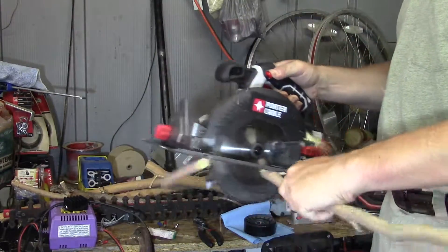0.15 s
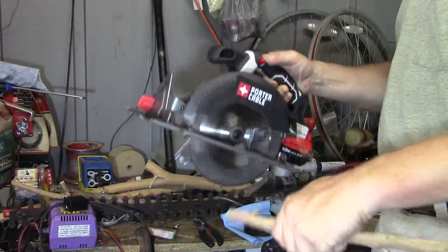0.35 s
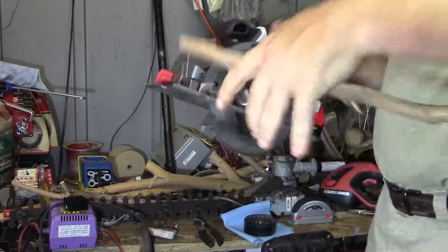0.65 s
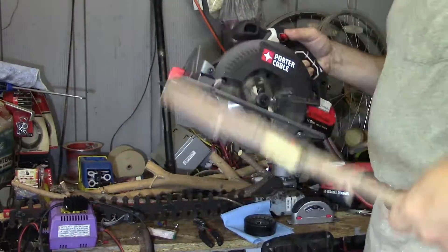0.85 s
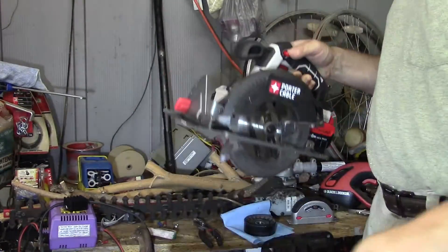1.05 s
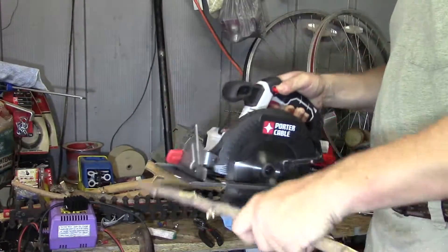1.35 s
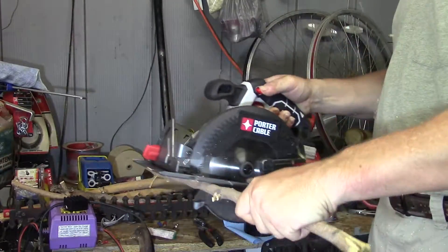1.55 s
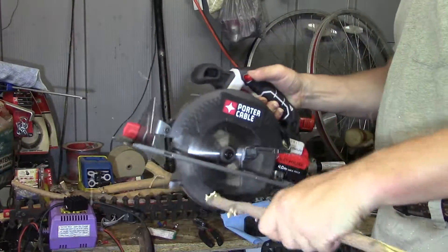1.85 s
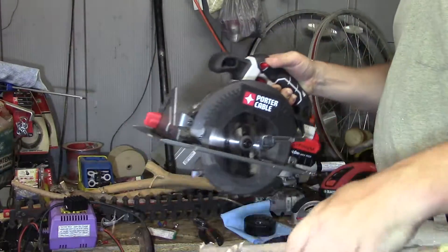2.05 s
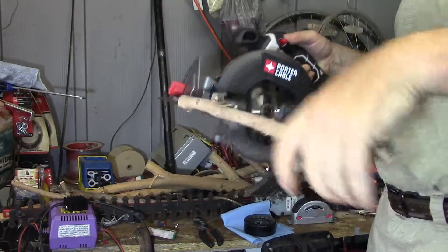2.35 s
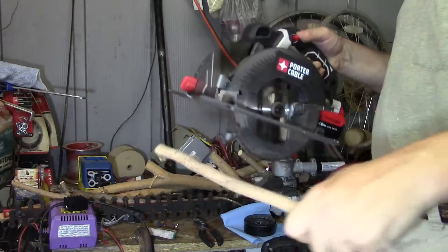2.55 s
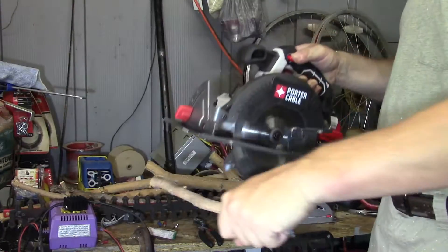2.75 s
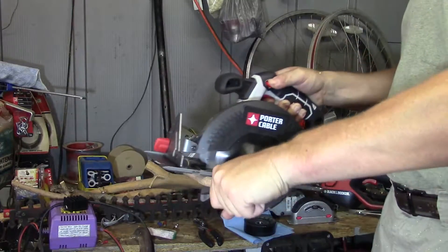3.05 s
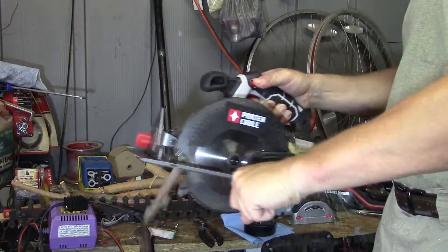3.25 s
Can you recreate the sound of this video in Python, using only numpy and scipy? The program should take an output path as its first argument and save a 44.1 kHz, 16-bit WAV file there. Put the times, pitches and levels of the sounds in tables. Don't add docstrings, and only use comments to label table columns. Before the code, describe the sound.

A handheld circular saw, already spinning, rips through a thin stick and brakes; the offcut knocks down. It spins up for a second cut, pieces clatter, then a third cut follows, close in a small workshop.

```python
import sys
import numpy as np
from scipy import signal
from scipy.fft import rfft, irfft, next_fast_len
from scipy.io import wavfile
from scipy.ndimage import uniform_filter1d, map_coordinates

SR = 44100
rng = np.random.default_rng(int(sys.argv[2]) if len(sys.argv) > 2 else 0)


def master_out(mix):
    frames = np.transpose(np.atleast_2d(mix))
    ceiling = np.clip(frames, -1, 1)
    pcm = np.round(ceiling * 32767).astype(np.int16)
    wavfile.write(sys.argv[1], SR, pcm)


def to_linear_factor(level_db):
    exponent = np.asarray(level_db, float) / 20
    return 10 ** exponent


N = 149940
T = np.arange(N) / SR

# frequency in Hz, level in dB per Hz.
FLOOR_SPECTRUM = [(18, -80.5), (30, -39), (182, -11), (299, -18), (359, -5), (532, -14.5), (2830, -25),
                  (3230, -28.5), (15500, -56.5)]
# frequency in Hz, gain in dB.
FLOOR_SIDE_GAIN = [(40, -10), (150, -15), (1000, -17)]
# frequency in Hz, 60 dB decay time in seconds.
ROOM_DECAY = [(200, 0.37), (2000, 0.24), (10000, .15)]
# frequency in Hz, side level under mid in dB.
ROOM_SIDE_GAIN = [(60, -10), (180, -20), (550, -29), (1650, -34), (3000, -31), (4970, -24), (15000, -19)]
FLOOR_DB, WET_DB = -49.5, -7

# start in seconds, length in seconds, level in dB, centre in Hz.
RUBS = [
    (0.625, 0.13, -40, 520),
    (2.825, 0.033, -33.5, 1300),
    (2.826, 0.43, -40.5, 265.5),
]

# start in seconds, peak level in dB, brightness in dB an octave.
STICK_HITS = [
    (.579, -8.5, -2),
    (.602, -20, 3),
    (.651, -30, 2.5),
    (.728, -34.5, -0.3),
    (.757, -16.5, 2),
    (.892, -32, -4),
]
TIN_HITS = [
    (2.089, -17, 1.85),
    (2.095, -19.5, -3),
    (2.108, -14.5, -1.5),
]
TWIG_HITS = [
    (2.292, -30, -5.5),
    (2.307, -26, -9),
    (2.388, -18, 0.9),
]
BENCH_HITS = [
    (2.543, -7.5, 0.13),
    (2.771, -25, 0.08),
    (2.809, -13.5, 0.1),
]
TRIGGER_HITS = [
    (1.131, -30, 0.11),
    (1.803, -32, .1),
    (2.749, -30, 1.58),
]
# frequency in Hz, level in dB, 60 dB decay time in seconds (at most 0.21
# s are used).
STICK_MODES = [(361, -4, 0.094), (736, 3, 0.11), (2160, -8.5, 0.24), (4124, -21, 0.097),
               (5170, -16.5, 0.094), (5373, -25, 0.23)]
TIN_MODES = [(350.5, -8, 0.17), (1680, -23.5, 0.16), (3830, -12.5, .12), (4194, -7.5, 0.15),
             (4150, -13, 0.13), (7000, -14, .11), (9150, -28, 0.05)]
TWIG_MODES = [(1100, -4.5, 0.19), (1675, -6.5, 0.15), (1846, -4, 0.23), (3180, -4, 0.26), (4600, -7, 0.29),
              (6000, -6, 0.15), (8530, -15, 0.22)]
BENCH_MODES = [(413, -12, 0.26), (716, 3, 0.12), (1130, -6, 0.12), (1340, 0, 0.14), (1450, -8, 0.12),
               (2089, -29, .18), (2900, -26, .16), (5700, -24, .07), (7100, -20, .19), (7930, -16, 0.14)]
TRIGGER_MODES = [(1384, 0.4, .3)]
# frequency in Hz, level in dB per Hz.
STICK_CRACK = [(88, -47.5), (150, 1), (1700, -4), (2410, -13.5), (5330, -23.5), (15500, -53.5)]
TIN_CRACK = [(100, -21), (383, -11), (3050, -13), (4220, 0), (5610, -24.5), (7160, -10), (15500, -55.5)]
TWIG_CRACK = [(100, -46), (500, -20.5), (1500, -5), (8080, -9.5), (15500, -39)]
BENCH_CRACK = [(88, -38), (150, 1), (450, -3.5), (1200, -3.5), (2810, -9), (7410, -25), (15500, -69)]
TRIGGER_CRACK = [(100, -38), (1420, -3), (3600, -9.5), (12800, -27.5), (15500, -48)]

# time in seconds, bite level in dB, brightness in dB.
CUTS = [
    [(0, -29.5, -16), (.013, -13, 5.5), (.04, -16.5, 3), (.075, -18, 5), (.105, -12.5, -1),
     (.135, -15, -2.5), (.175, -34, -3.5)],
    [(1.492, -36, 11), (1.499, -11, 2), (1.54, -16, -1.5), (1.6, -20, 2.5), (1.625, -18.5, 8.5),
     (1.655, -22.5, 5.5), (1.695, -16, -2.5), (1.735, -37.5, -11)],
    [(3.1, -33.5, 11), (3.118, -13, 0.5), (3.15, -13, 4), (3.175, -13, 1), (3.23, -19, -1),
     (3.27, -32, -10)],
]
# frequency in Hz, level in dB per Hz.
CHIP_SPECTRUM = [(180, -62.5), (300, -35.5), (1100, -4), (1680, -8), (3980, -2), (5830, -3.5), (8540, 9),
                 (15800, -10.5)]
# frequency in Hz, width in Hz, level in dB.
BLADE_MODES = [
    [(1014, 60, -19), (1454, 22, 3.5), (2251, 30, -10), (4110, 27, 0), (5420, 29, -9.5), (6210, 93, -8),
     (7040, 25, 2), (7270, 48, -3.5), (7600, 85, -4.5), (8240, 33, -6), (8600, 66, -8.5), (8840, 54, -3.5),
     (9430, 100, -6.5)],
    [(1422, 37, -3), (1886, 47, -1), (3560, 26, -5.5), (4190, 51, -2.5), (5450, 21, -15), (6200, 70, -2.5),
     (6700, 130, -6.5), (7000, 36, 1), (7600, 41, -2.5), (8210, 40, -2), (8650, 75, -4), (8700, 58, 3),
     (9950, 37, -6)],
    [(1430, 160, -5), (2283, 64, -1), (2760, 36, -10), (3080, 27, -2), (3496, 15, -3.5), (3840, 210, 0),
     (5980, 51, -17), (7280, 97, 5.5), (7780, 92, -1), (7750, 53, 2.5), (8050, 120, -3.5),
     (8700, 190, -1.5), (10100, 49, -6.5)],
]
# frequency in Hz, level in dB, 60 dB decay time in seconds,
# swell in dB as the blade stops.
AFTER_RING = [(2729, 0, .7, 3), (2785, 4, 2.4, 2), (2896, -2, .8, 5), (4915, -7, .9, 11), (2213, -7, .8, 0),
              (1840, -10, 1.5, 2), (1061, -9, 1.2, 0), (3350, -14, 1.2, 5), (3838, -12, 1, 4),
              (3558, -9, .4, 0), (7630, -12, .6, 4)]
RING_EACH_DB = [-37, -39, -43]
SPLIT_HZ, BLADE_DB = 5250, 12.5
TOOTH_JITTER, TOOTH_SHARE = .35, .33
STOPS_S, SWELL_S = .2, .06

# pulled in seconds, released in seconds, motor level in dB.
PULLS = [
    (-.4, 0.279, -29.5),
    (1.144, 1.805, -29),
    (2.756, 3.36, -27),
]
# multiple of mesh rate, driven level in dB, braking level in dB.
MESH_LINES = [(1, -4, -12.5), (2, -8, -7), (3, -10.5, -11), (4, -6, -18), (5.5, -28, -20)]
# frequency in Hz, gain in dB.
GEARBOX_GAIN = [(500, -16), (1400, 0.5), (2300, 3), (3400, -1), (4700, -13), (5800, -17), (7000, -3.5),
                (9500, -10), (14000, -5.5)]
# frequency in Hz, level in dB per Hz.
HOUSING_SPECTRUM = [(150, -53), (250, -20), (1740, -10.5), (3500, -11.5), (5570, -20), (7300, -31.5),
                    (10800, -24.5), (13300, -12), (15800, -42)]
# frequency in Hz, width in Hz, level in dB.
WHINE_MODES = [(1530, 130, -6), (2220, 390, 6), (4000, 323, 1), (7360, 380, 7), (12600, 660, -10)]
MESH_HZ, SPINUP_S, BRAKE_S = 2607, .125, .112
LOAD_SAG, RECOVER_S, DRAG_HZ = .07, .15, 328.5
MESH_PER_TURN, PINION_TEETH, BLADE_TEETH = 42, 5.6, 19
IDLE_TORQUE, BRAKING_TORQUE = .3, 1.6
LOUDER_POWER, BRAKE_DB = .78, 1.5
SIDEBAND_DB, TURN_DEPTH, WANDER, ROUGH_RAD = -10.5, .9, .0048, .42


def unit(x):
    return x / np.sqrt(np.mean(x ** 2) + 1e-20)


def along(points, hz):
    f, v = np.transpose(points)
    return np.interp(np.log(hz + 1), np.log(f + 1), v)


def wobble(rate):
    return map_coordinates(rng.standard_normal(int(N * rate / SR) + 4), [T * rate])


def filtered(x, response):
    m = next_fast_len(x.shape[-1] + 2 * SR)
    spectrum = rfft(x, m) * response(np.fft.rfftfreq(m, 1 / SR))
    return irfft(spectrum, m)[..., :x.shape[-1]]


def colour(points):
    return lambda hz: to_linear_factor(along(points, hz))


def resonances(rows):
    def response(f):
        total = 0
        for k, (centre, width, db) in enumerate(rows):
            damping = 1j * f * width
            total = total + (-1) ** k * to_linear_factor(db) * damping / (centre * centre - f * f + damping)
        return total
    return response


def patchy(x, depth_db):
    z = signal.stft(x, nperseg=256)[2]
    field = uniform_filter1d(rng.standard_normal(z.shape), size=3, axis=0)
    field = uniform_filter1d(field, size=6, axis=1)
    return signal.istft(z * to_linear_factor(depth_db * unit(field)), nperseg=256)[1][:N]


def floor_noise():
    noise = filtered(rng.standard_normal((2, N)) * to_linear_factor(1.7 * wobble(12)), colour(FLOOR_SPECTRUM))
    return noise * to_linear_factor(FLOOR_DB) / np.std(noise[0])


def workshop(x):
    hz, t, z = signal.stft(rng.standard_normal((2, SR // 2)), SR, nperseg=256)
    decay = to_linear_factor(-60 * t / along(ROOM_DECAY, hz)[:, None])
    tail = signal.istft(z * decay, SR, nperseg=256)[1]
    delayed = np.pad(x, (250, 0))[None]
    return signal.fftconvolve(delayed, tail / np.linalg.norm(tail[0]), axes=1)[:, :N]


def rubs():
    out = 0
    for s, length, db, hz in RUBS:
        shape = np.clip(np.minimum((T - s) / 0.0047, (s + length - T) / (.4 * length)), 0, 1)
        dull = lambda f: resonances([(hz, 1.6 * hz, 0)])(f) ** 2 / (1 + (f / 4500) ** 2)
        scrape = unit(filtered(rng.standard_normal(N), dull))
        out = out + shape * to_linear_factor(db + 3 * wobble(90)) * scrape
    return out


def knock(hits, modes, crack, ring_db, crack_s, crack_db):
    out, t = np.zeros(N + SR), T[:SR // 2]
    for s, db, tilt_db in hits:
        tilt = lambda f: to_linear_factor(tilt_db * np.log2((f + 1) / 1500))
        contact = lambda f: colour(crack)(f) * tilt(f)
        ring = 0
        for hz, mode_db, t60 in modes:
            envelope = to_linear_factor(mode_db + 2.8 * wobble(60)[:len(t)] - 60 * t / min(t60, .21))
            ring = ring + envelope * tilt(hz) * np.sin(2 * np.pi * hz * t)
        burst = unit(filtered(rng.standard_normal(len(t)), contact)) * to_linear_factor(crack_db - 60 * t / crack_s)
        tick = unit(filtered(rng.standard_normal(len(t)), lambda f: contact(f) ** 1.8))
        tick = tick * to_linear_factor(-13.0 - 60 * t / 0.0072)
        onset = 1 - np.exp(-t * SR / 10)
        out[round(s * SR):][:len(t)] += to_linear_factor(db) * (to_linear_factor(ring_db) * ring + burst + tick) * onset
    return out[:N]


def offcuts_and_trigger():
    stick = knock(STICK_HITS, STICK_MODES, STICK_CRACK, ring_db=-17, crack_s=.11, crack_db=-5.5)
    tin = knock(TIN_HITS, TIN_MODES, TIN_CRACK, ring_db=-5, crack_s=.041, crack_db=-2.16)
    twig = knock(TWIG_HITS, TWIG_MODES, TWIG_CRACK, ring_db=-12, crack_s=.063, crack_db=-2.5)
    bench = knock(BENCH_HITS, BENCH_MODES, BENCH_CRACK, ring_db=-19, crack_s=.096, crack_db=-7)
    trigger = knock(TRIGGER_HITS, TRIGGER_MODES, TRIGGER_CRACK, ring_db=-14, crack_s=.19, crack_db=-11.5)
    return stick + tin + twig + bench + trigger


def after_ring():
    out = 0
    for rows, (on, off, _), cut_db in zip(CUTS, PULLS, RING_EACH_DB):
        t = np.clip(T - rows[-2][0], 0, None)
        stop = np.exp(-((T - off - STOPS_S) / SWELL_S) ** 2)
        for hz, db, t60, swell_db in AFTER_RING:
            envelope = to_linear_factor(cut_db + db + swell_db * stop + 2 * wobble(16) - 60 * t / t60)
            out = out + envelope * np.sin(2 * np.pi * hz * t)
    return out


def bite(cuts):
    low, high = np.zeros(N), np.zeros(N)
    for rows in cuts:
        s, db, bright_db = np.transpose(rows)
        inside = np.clip(np.minimum(T - s[0] + 0.001, s[-1] - T) / 0.0035, 0, 1)
        low += inside * to_linear_factor(np.interp(T, s, db))
        high += inside * to_linear_factor(np.interp(T, s, db + bright_db))
    return low, high


def drive():
    hz, gain, torque = np.zeros(N), np.zeros(N), np.zeros(N)
    keep = np.exp(-1 / (RECOVER_S * SR))
    load = signal.lfilter([1 - keep], [1, -keep], bite(CUTS)[0])
    for on, off, db in PULLS:
        released = T > off
        up = MESH_HZ * (1 - np.exp(-np.clip(np.minimum(T, off) - on, 0, None) / SPINUP_S))
        slowing = np.exp(-np.clip(T - off, 0, None) / BRAKE_S)
        speed = np.clip((up + DRAG_HZ) * slowing - DRAG_HZ, 0, None)
        hz += speed
        gain += to_linear_factor(db + BRAKE_DB * released) * (speed / MESH_HZ) ** np.where(released, .9, LOUDER_POWER)
        driving = np.clip(IDLE_TORQUE + 5 * (1 - up / MESH_HZ), 0, 1.2)
        torque += (speed > 0) * np.where(released, BRAKING_TORQUE, driving)
    return hz * (1 - LOAD_SAG * load / load.max()), gain, torque


def tooth_force():
    teeth = np.cumsum(drive()[0]) / SR * BLADE_TEETH / MESH_PER_TURN
    at = np.flatnonzero(np.diff(np.floor(teeth + TOOTH_JITTER * wobble(900))) > 0)
    strikes = np.zeros(N)
    strikes[at] = to_linear_factor(2.7 * rng.standard_normal(len(at)))
    gate = np.convolve(strikes, to_linear_factor(-60 * T[:200] / 0.0017))[:N]
    gated = TOOTH_SHARE * unit(gate) + 1 - TOOTH_SHARE
    return rng.standard_normal(N) * gated * to_linear_factor(2.01 * wobble(70))


def cutting():
    force, chips = tooth_force(), colour(CHIP_SPECTRUM)
    grid = np.fft.rfftfreq(SR // 4, 1 / SR)
    low_band = lambda f: 1 / (1 + (f / SPLIT_HZ) ** 6)
    high_band = lambda f: 1 - low_band(f)
    out = 0
    for rows, modes in zip(CUTS, BLADE_MODES):
        blade = resonances(modes)
        for gain, band in zip(bite([rows]), (low_band, high_band)):
            body = lambda f: band(f) * chips(f) * (1 + to_linear_factor(BLADE_DB) * blade(f) / (0.26 + chips(f)))
            level = np.linalg.norm(body(grid)) / np.sqrt(len(grid))
            out = out + filtered(gain * force, body) / level
    return to_linear_factor(-2.5) * patchy(out, depth_db=2.5) + after_ring()


def gear_mesh(turn, torque):
    lines = 0
    for k, db, brake_db in MESH_LINES:
        level = np.where(torque >= BRAKING_TORQUE, brake_db, db) + 4 * wobble(70)
        lines = lines + to_linear_factor(level) * np.sin(k * turn + ROUGH_RAD * k * wobble(300))
    return lines * (1 + to_linear_factor(SIDEBAND_DB) * 2 * np.cos(turn / PINION_TEETH))


def brush_noise(turn, speed):
    hiss = rng.standard_normal((3, N)) * to_linear_factor(1.2 * np.array([wobble(30), wobble(27), wobble(30)]))
    throb = np.exp(TURN_DEPTH * 2 * np.cos(turn / MESH_PER_TURN))
    top = resonances(WHINE_MODES[-1:])
    broad = unit(filtered(hiss[0], colour(HOUSING_SPECTRUM)))
    peaky = unit(filtered(hiss[1], resonances(WHINE_MODES[:-1])))
    chirp = unit(filtered(hiss[2] * throb, lambda f: top(f) ** 2))
    return to_linear_factor(-8.0) * broad + to_linear_factor(-5.0) * peaky * speed ** .5 + to_linear_factor(-11) * chirp * speed ** 2


def motor():
    hz, gain, torque = drive()
    turn = 2 * np.pi * np.cumsum(hz * (1 + WANDER * wobble(60))) / SR
    ring = resonances(WHINE_MODES[:-1])
    case = lambda f: colour(GEARBOX_GAIN)(f) * (1 + ring(f))
    tones = filtered(gain * torque * gear_mesh(turn, torque), case)
    return gain * brush_noise(turn, hz / MESH_HZ) + tones


def scene():
    bass_cut = lambda f: (1j * f / (150 + 1j * f)) ** 3
    dry = filtered(motor() + cutting() + offcuts_and_trigger() + rubs(), bass_cut)
    wet, ambient = workshop(dry), floor_noise()
    mid = dry + to_linear_factor(WET_DB) * wet[0] + ambient[0]
    side = filtered(wet[1], colour(ROOM_SIDE_GAIN)) + filtered(ambient[1], colour(FLOOR_SIDE_GAIN))
    return np.array([mid + side, mid - side])


def low_pass(x):
    return signal.sosfilt(signal.butter(12, 15900, fs=SR, output="sos"), x)


def record(dry):
    ceiling = .8
    limited = dry / (1 + np.abs(dry / ceiling) ** 10) ** (1 / 10)
    mix = filtered(limited, lambda f: (f < 15900) * 1j * f / (60 + 1j * f))
    return low_pass(mix)


dry = scene()
out = record(dry)
master_out(out)
```